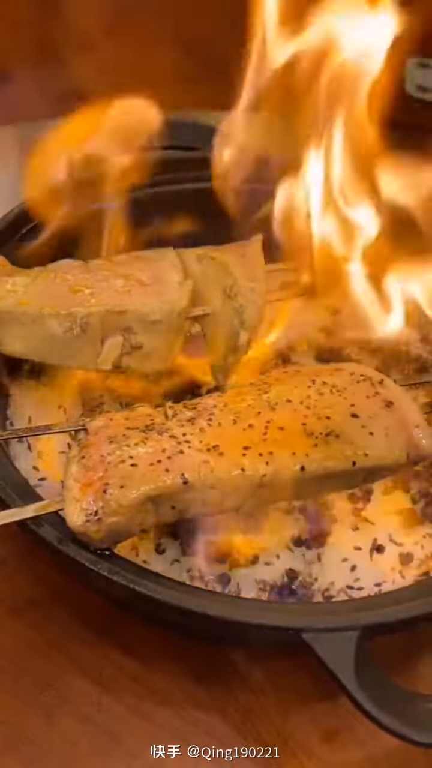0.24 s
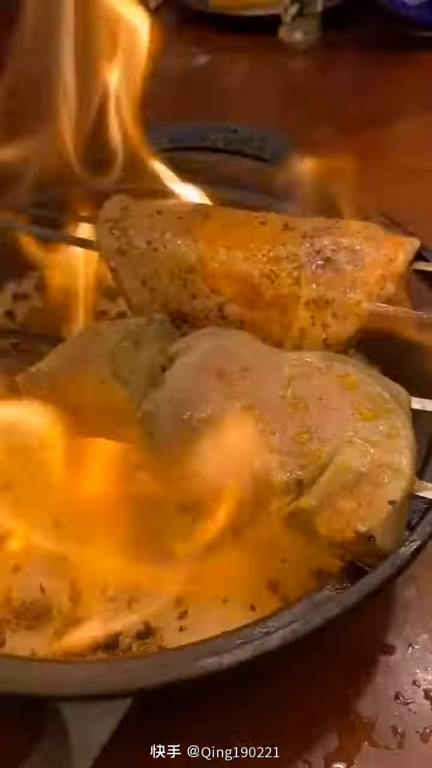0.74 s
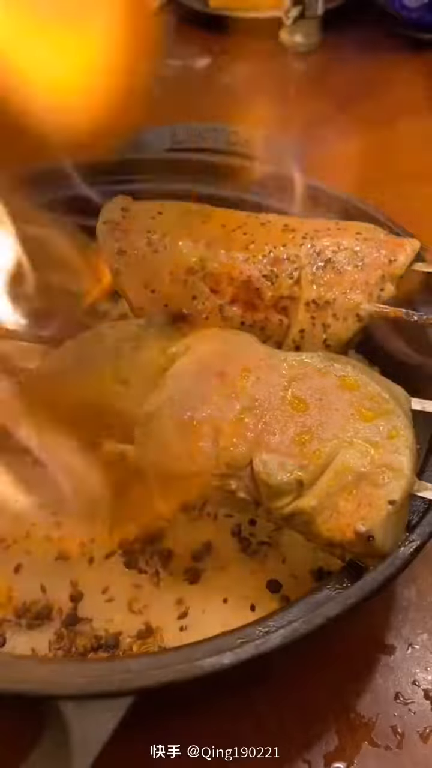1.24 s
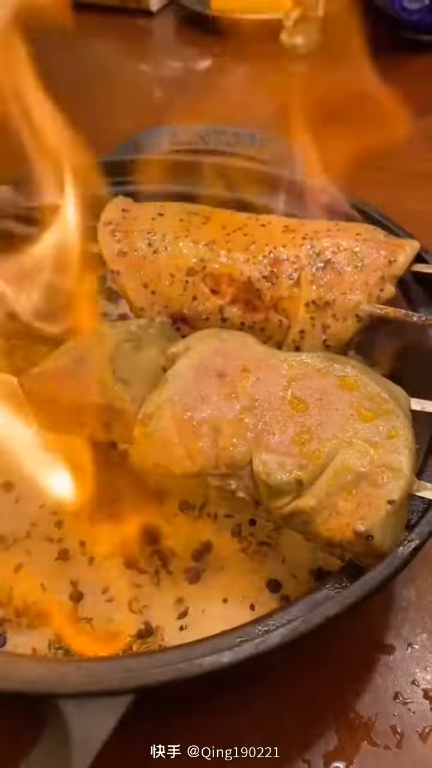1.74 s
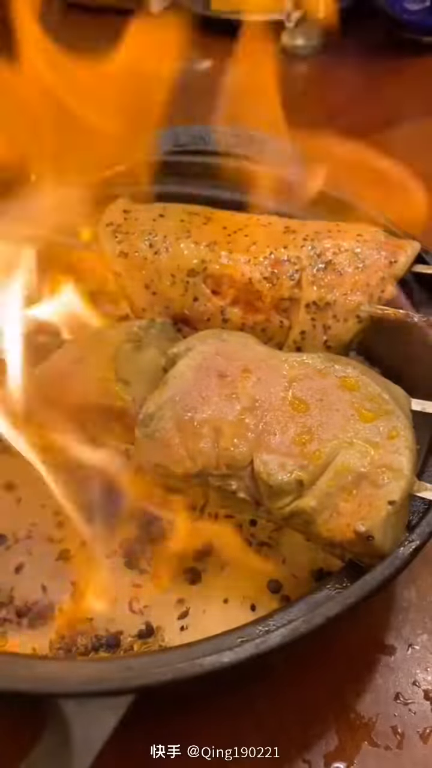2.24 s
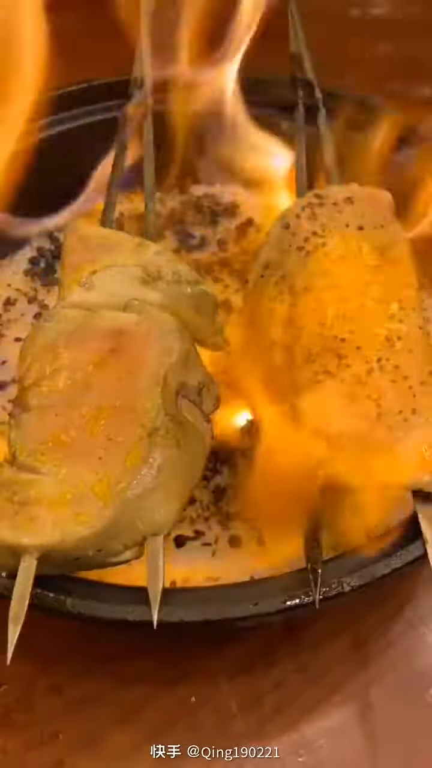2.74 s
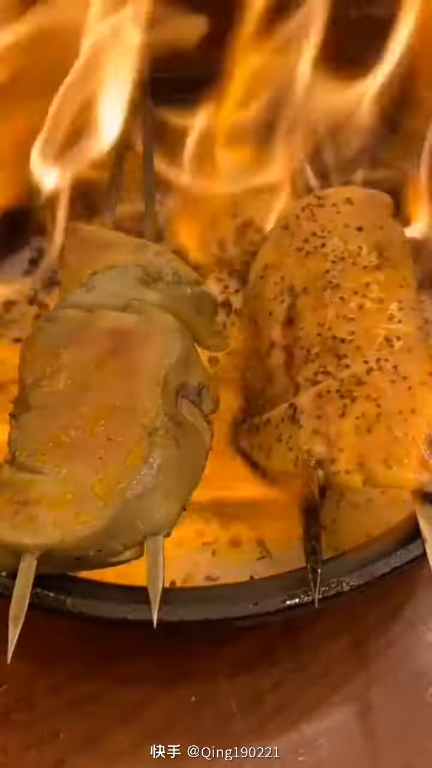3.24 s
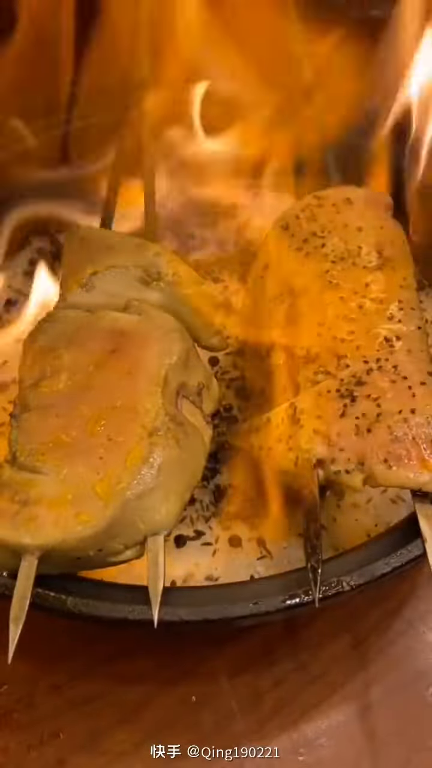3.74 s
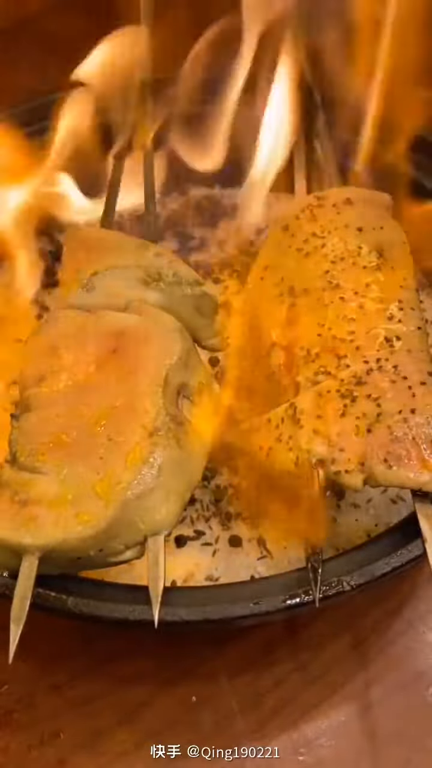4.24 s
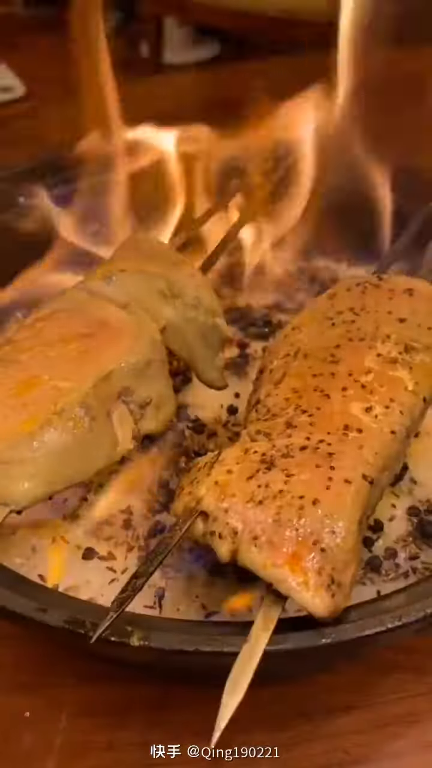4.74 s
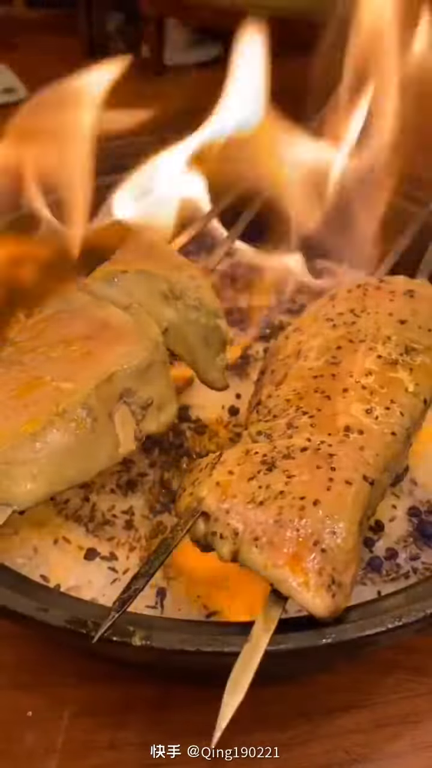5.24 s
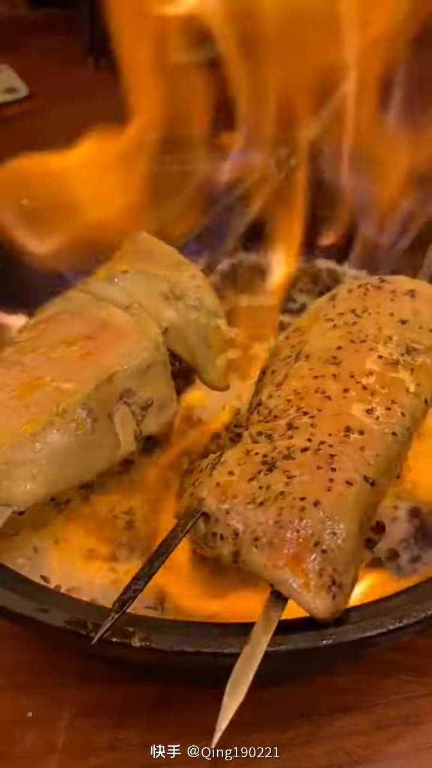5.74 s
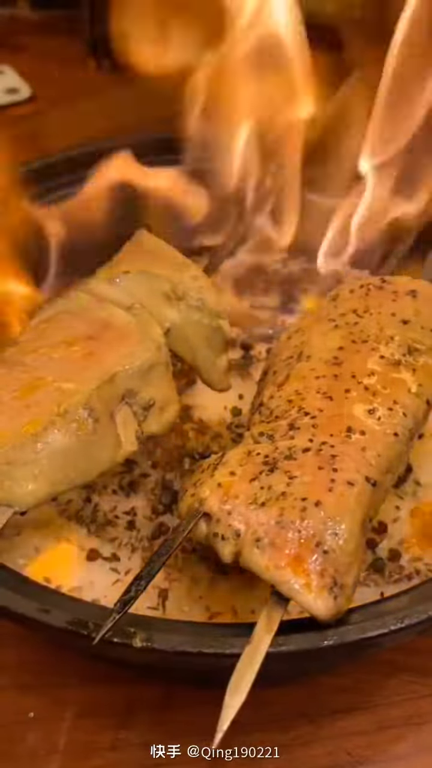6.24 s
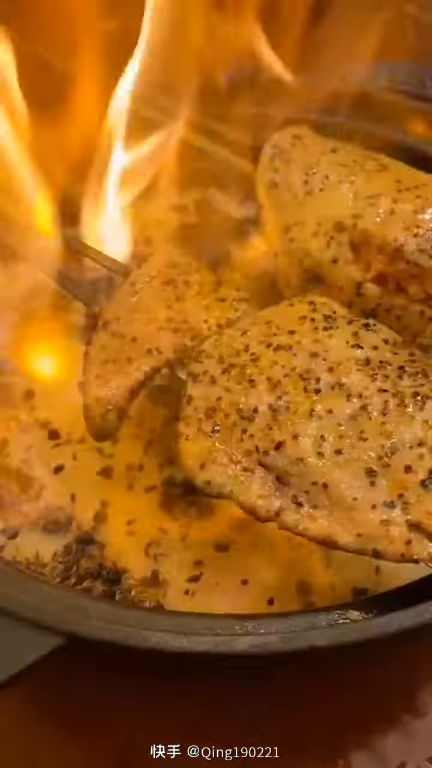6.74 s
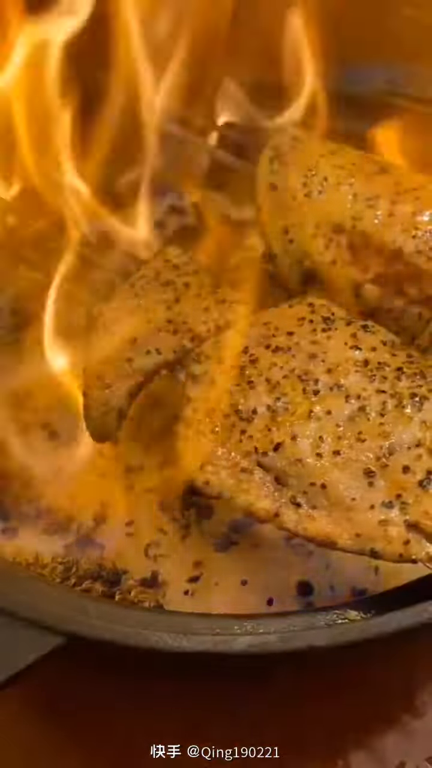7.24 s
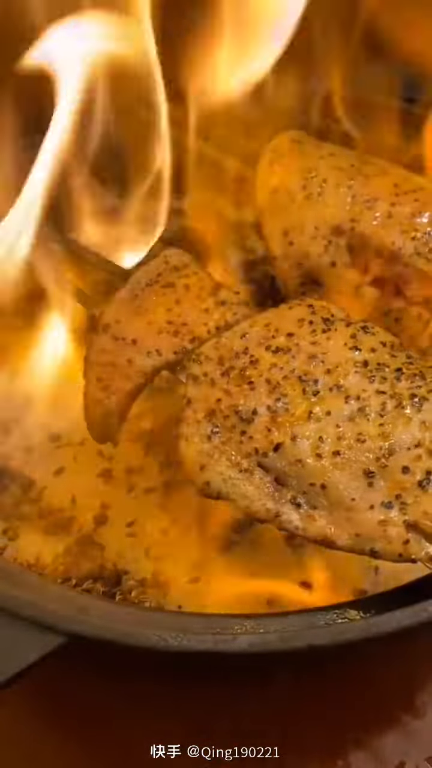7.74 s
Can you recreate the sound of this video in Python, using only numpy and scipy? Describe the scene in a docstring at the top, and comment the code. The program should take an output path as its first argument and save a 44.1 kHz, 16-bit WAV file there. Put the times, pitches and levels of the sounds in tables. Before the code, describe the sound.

Skewered meat drips fat into a flaming pan of hot salt and spices. Fine bright sizzle comes in irregular spurts over a quiet simmer, with coarse spatter and sharp, snapping pops. Flames flutter and rumble low beneath, with a faint mains hum. The level dips almost to silence four times, each time returning with a slightly different tone. Close stereo microphone, small dry indoor space.

```python
"""Fat dripping from skewered food fries in a pot of hot salt: noise follows swarms of tiny bursts.
It sizzles and spatters in spurts over a quiet simmer, and larger droplets burst as sharp cracks
with a falling pulse; one short squeak of steam is narrow noise. Flames rumble in billowing low noise.
A wavering sine is the mains hum underneath, and four times the whole sound dips briefly to near silence."""
import sys
import numpy as np
from scipy import signal
from scipy.fft import rfft, irfft
from scipy.io import wavfile
from scipy.ndimage import uniform_filter1d

SR = 44100
rng = np.random.default_rng(int(sys.argv[2]) if len(sys.argv) > 2 else 0)


def digitize_waveform(pressure):
    """Quantize a signal to 16-bit integers and store it at the path in sys.argv[1].

    Rows of a 2-D input are taken as channels; values are limited to [-1, 1].
    """
    field = np.atleast_2d(pressure).T
    bounded = np.clip(field, -1, 1)
    quanta = np.round(bounded * 32767).astype(np.int16)
    wavfile.write(sys.argv[1], SR, quanta)


N = 352800
HZ = np.fft.rfftfreq(N, 1 / SR)
TIME = np.arange(N) / SR


def amp(db):
    """Decibels to gain."""
    return 10 ** (np.asarray(db) / 20)


def unit(x):
    """Scales to an rms of one."""
    return x / np.sqrt(np.mean(x ** 2) + 1e-20)


def read(points, axis=1):
    """One column of a frequency table, joined up along a log frequency axis."""
    points = np.asarray(points)
    return np.interp(np.log(HZ + 1), np.log(points[:, 0]), points[:, axis])


def add(mix, s, sound):
    """Mixes a sound in at a time in seconds."""
    part = mix[..., max(round(s * SR), 0):][..., :sound.shape[-1]]
    part += sound[..., :part.shape[-1]]


def colour(x, points, lag_cycles=0):
    """Filters with a curve of rms gain one; lagging by cycles delays the lows most, so clicks fall in pitch."""
    gain = unit(amp(read(points)))
    lag = np.exp(-2j * np.pi * lag_cycles * np.log(HZ + 100))
    return irfft(rfft(x) * gain * lag, N)


def wander(rate_hz):
    """Slow random drift of rms one: noise low-passed at the given rate."""
    return unit(irfft(rfft(rng.standard_normal(N)) / (1 + (HZ / rate_hz) ** 4), N))


def bursts(per_s, spread_db, decay_s):
    """Power of a swarm of tiny decaying bursts, many small and few large, with a mean of one."""
    happens = rng.random(N) < per_s / SR
    sizes = amp(spread_db * np.minimum(rng.exponential(1, N), 3.6)) * happens
    power = signal.lfilter([1], [1, -np.exp(-1 / (decay_s * SR))], sizes ** 2)
    return power / power.mean()


def crackle(power, smooth_share):
    """Noise that follows a swarm of bursts, over a steady wash of ones too small to tell apart."""
    return np.sqrt(smooth_share + (1 - smooth_share) * power) * rng.standard_normal((2, N))


def ports(pair):
    """Two microphone ports: two signals become left and right, most alike in the bass, apart in phase above."""
    # Each row: frequency in Hz, likeness from 0 to 1, lead of the left in radians, left over right in dB.
    stereo_rows = [(90, .9994, 0, 0), (170, .996, 0, 0), (330, .98, 0, 0), (750, .89, -.2, 0),
                   (1300, .995, 0, 0), (2050, .98, .1, 0), (2600, .64, 1.4, -3), (2950, .5, 2.6, 0),
                   (3150, .25, 1.6, 0), (3400, .6, .3, -2), (4350, .5, 1, -1), (4850, .68, 3.3, 0),
                   (5300, .78, 6.3, 0), (7000, .52, 7.3, 0), (9400, .5, 8.3, 0), (9900, .54, 6.7, 0),
                   (10600, .42, 7.3, 0), (11050, .25, 9.4, 0), (11500, .76, 12.6, 0), (13500, .45, 13.4, 0),
                   (15500, .28, 14.2, 0)]
    shared, own = rfft(pair)
    alike = read(stereo_rows)
    # half of the lead and of the level difference goes to each side
    turn = np.exp(.5j * read(stereo_rows, axis=2)) * amp(.5 * read(stereo_rows, axis=3))
    shared = shared * np.sqrt((1 + alike) / 2)
    own = own * np.sqrt((1 - alike) / 2)
    return irfft(np.array([(shared + own) * turn, (shared - own) / turn]), N)


def room(x, t60_s=0.029, wet_db=-17):
    """Faint, quick reflections from the table and walls: sparse random taps that die away."""
    t = np.arange(SR // 3) / SR
    hits = rng.random((2, len(t))) < 2000 / SR  # 2000 reflections per second
    taps = rng.standard_normal((2, len(t))) * hits * (t > .002) * amp(-60 * t / t60_s)
    taps = taps / np.linalg.norm(taps[0])
    return x + amp(wet_db) * signal.fftconvolve(x[:1], taps, axes=1)[:, :N]


def placed(x, echo_edge_hz=5000, air_hz=12000):
    """An echo off the table combs the sound, differently wherever the microphone is held."""
    # Each row: start in seconds, spacing of the comb in Hz, echo strength as a signed gain,
    # gain in dB that the top treble tends to (half of these dB at air_hz).
    place_rows = [(0, 2450, -0.071, -7.5), (.76, 2300, 0.15, -5), (2.612, 1590, 0.035, -7),
                  (4.595, 2330, 0.21, -3.5), (6.627, 803, -0.16, -9.5)]
    spectrum, out = rfft(x), np.zeros((2, N))
    for s, comb_hz, strength, air_db in place_rows:
        echo = strength * np.exp(-2j * np.pi * HZ / comb_hz) / (1 + (HZ / echo_edge_hz) ** 2)
        air = amp(air_db * HZ ** 4 / (HZ ** 4 + air_hz ** 4))
        out = np.where(TIME >= s, irfft(spectrum * (1 + echo) * air, N), out)
    return out


def hum(hz=100, peak_db=-43, waver_db=3.0):
    """A mains hum: one sine that wavers in level and a little in phase."""
    phase_drift = 0.13 * wander(2.3)  # radians
    return amp(peak_db + waver_db * wander(5.6)) * np.sin(2 * np.pi * hz * TIME + phase_drift)


def flames(steady_db=-44, flare_s=0.05, lift_db=3):
    """The low roar of hot gas, billowing in uneven puffs and swelling with each flare."""
    # The flames leap up. Each row: peak in seconds, roar in dB ahead of the lift.
    flare_rows = [(.29, -36), (1.3, -44.5), (2.08, -41.5), (2.72, -44), (3.28, -44), (3.61, -44.5),
                  (4.45, -40.5), (5.51, -36), (6.18, -42.5), (6.46, -38), (6.74, -40), (6.99, -39)]
    # Tone of the roar. Each row: frequency in Hz, relative level in dB.
    rumble_tone = [(15, -32), (30, -23), (45, -3), (60, -0.5), (82, 1), (102, -2.5), (135, -3), (190, -12),
                   (400, -29)]
    power = amp(steady_db) ** 2
    for s, db in flare_rows:
        power = power + amp(db) ** 2 * np.exp(-((TIME - s) / flare_s) ** 2)
    puffs = unit(amp(2.6 * wander(15)))
    roar = colour(rng.standard_normal((2, N)), rumble_tone)
    return amp(lift_db) * np.sqrt(power) * puffs * roar


def squeak(s=1.2565, hz=8000, width_hz=450, decay_s=0.01, db=-25):
    """Steam escapes through a tiny hole with one short, high squeak: narrow noise that starts at once and dies."""
    band = np.exp(-.5 * ((HZ - hz) / width_hz) ** 2)
    jet = unit(irfft(rfft(rng.standard_normal((2, N))) * band, N))
    return amp(db) * jet * (TIME > s) * np.exp(-abs(TIME - s) / decay_s)


def pops(spray_db=-23, ragged=0.32):
    """A droplet bursts with a crack and a short spray; its pressure pulse falls in pitch to a puff."""
    # The loudest droplets. Each row: time in seconds, body in dB and crack in dB, both ahead of the final lifts.
    pop_rows = [(0.0314, -20, -18), (0.1287, -42, -25), (0.2275, -28, -43), (0.4478, -29, -18),
                (0.4818, -16, -24), (0.4937, -18, -19), (0.5048, -21, -21), (0.5158, -18, -25),
                (0.685, -31, -28), (0.7988, -25, -29), (0.8306, -26, -35), (0.9648, -30, -28),
                (1.0205, -26, -21), (1.043, -26, -19), (1.1184, -26, -26), (1.2924, -26, -29),
                (1.3865, -16, -22), (1.4475, -29, -36), (1.5297, -25, -30), (1.5483, -23, -32),
                (1.5788, -16, -28), (1.5942, -20, -33), (1.8812, -24, -29), (1.9063, -18, -19),
                (1.951, -19, -23), (2.0487, -25, -39), (2.1451, -19, -28), (2.2354, -28, -29),
                (2.3048, -26, -34), (2.4389, -27, -25), (2.517, -29, -26), (2.6415, -32, -23),
                (2.7161, -18, -17), (2.7444, -23, -24), (2.7923, -31, -21), (2.8641, -28, -26),
                (2.9954, -24, -23), (3.1043, -41, -26), (3.2696, -32, -23), (3.4462, -27, -24),
                (3.4854, -30, -20), (3.494, -37, -24), (3.7121, -33, -23), (3.8707, -36, -27),
                (3.9037, -34, -29), (3.9637, -28, -25), (3.9763, -37, -24), (4.0752, -27, -27),
                (4.2758, -28, -31), (4.4855, -30, -32), (4.7506, -37, -29), (4.8007, -33, -20),
                (4.8127, -23, -19), (4.9937, -40, -28), (5.0685, -38, -25), (5.141, -26, -24),
                (5.2051, -34, -27), (5.3867, -32, -29), (5.3938, -26, -35), (5.6643, -12.5, -18),
                (6.1219, -32, -26), (6.167, -30, -26), (6.1765, -30, -28), (6.2006, -27, -27),
                (6.2807, -31, -25), (6.4048, -32, -23), (6.4403, -39, -23), (6.5037, -31, -24),
                (6.6754, -31, -27), (6.7205, -30, -22), (6.8023, -30, -29), (6.8907, -23, -25),
                (6.9242, -26, -24), (6.9511, -28, -21), (7.039, -16, -25), (7.0495, -21, -24),
                (7.1604, -14, -21), (7.288, -29, -16), (7.3836, -25, -30), (7.4212, -33, -24),
                (7.4786, -21, -16), (7.5479, -28, -24), (7.6419, -33, -20), (7.7383, -29, -26),
                (7.858, -24, -20), (7.9622, -18, -18)]
    # Tones of the pulse and of the crack. Each row: frequency in Hz, relative level in dB.
    body_tone = [(70, -10), (250, -4), (500, -4), (1150, -5.5), (1700, 3), (2400, 0), (3200, -16),
                 (6000, -31)]
    crack_tone = [(1500, -16), (3200, -2), (5500, 1.5), (8500, -1), (11000, -1.5), (16000, -4)]
    swell_s, crack_s, spray_s = .0004, .00048, .0025  # time constants
    t = np.arange(round(.02 * SR)) / SR
    pulses, cracks = np.zeros((2, 2, N))
    for s, body_db, crack_db in pop_rows:
        # bright, thin pops spray the most, up to a limit
        wetness = min(amp(spray_db + 0.49 * (crack_db - body_db)), 1 / 10)
        decay = np.exp(-t / crack_s) + wetness * np.exp(-t / spray_s)
        noise = (1 - np.exp(-t / swell_s)) * decay * rng.standard_normal((2, 2, len(t)))
        low, high = noise / np.linalg.norm(noise, axis=-1, keepdims=True)
        add(pulses[0], s, amp([body_db]))  # a clean click
        add(pulses, s - swell_s, ragged * amp(body_db) * low)  # roughened by noise
        add(cracks, s, amp(crack_db) * high)
    body = amp(17.5) * colour(pulses, body_tone, lag_cycles=1.05)
    return body + amp(22.0) * colour(cracks, crack_tone)


def patchy(x, patchy_db=1.59):
    """The colour shifts at random in small patches of time and pitch, as fat boils in different spots."""
    z = signal.stft(x, nperseg=256)[2]
    patches = uniform_filter1d(rng.standard_normal(z.shape[1:]), size=5, axis=0)
    patches = unit(uniform_filter1d(patches, size=10, axis=1))
    return signal.istft(z * unit(amp(patchy_db * patches)))[1][:, :N]


def boiling(attack_s=0.027, release_s=0.04, rise_db=0.26):
    """Gains of flutter, spatter and sizzle: each spurt builds, holds and dies over a steady simmer."""
    # Drips of fat that boil off. Each row: start in seconds, length in seconds,
    # then flame flutter, coarse spatter and fine sizzle in dB ahead of the frying mix.
    spurt_rows = [(-0.015, 0.036, -53, -30.5, -25.5), (0.097, 0.14, -39.0, -38.5, -37),
                  (0.25, 0.029, -42, -47, -31), (0.332, 0.063, -46, -33.5, -30.5),
                  (0.409, 0.11, -33.5, -29.5, -28), (0.671, 0.021, -57, -40, -29.5),
                  (0.754, 0.085, -37.5, -34.5, -40), (0.924, 0.04, -44.5, -37, -34),
                  (1.004, 0.017, -44, -40, -29), (1.098, 0.018, -37, -52, -49),
                  (1.309, 0.072, -32.5, -34.5, -34.5), (1.513, 0.084, -43.5, -27.5, -31),
                  (1.612, 0.096, -43, -47, -38), (1.8, 0.1, -40.5, -33.5, -31),
                  (2.111, 0.021, -31.5, -46, -40), (2.167, 0.07, -46, -39, -37),
                  (2.275, 0.061, -40.5, -37.5, -39.5), (2.369, 0.068, -49, -37.5, -33),
                  (2.47, 0.072, -41, -41.5, -38), (2.622, 0.12, -33, -31, -27.5),
                  (2.764, 0.096, -40, -39.5, -31), (2.883, 0.12, -38, -35, -27),
                  (3.006, 0.091, -43.5, -38, -30), (3.132, 0.19, -43.5, -41, -31),
                  (3.349, 0.12, -37.5, -37, -26), (3.674, 0.035, -48, -40, -29),
                  (3.931, 0.078, -43, -40, -34.5), (4.004, 0.092, -39.5, -36.5, -29),
                  (4.393, 0.025, -43, -38.5, -40.5), (5.02, 0.069, -47, -45.5, -39),
                  (5.13, 0.063, -47, -41.5, -39.5), (5.318, 0.045, -41, -39, -33),
                  (5.475, 0.13, -43, -40, -36.5), (5.635, 0.02, -39, -44, -42.5),
                  (5.856, 0.028, -41.5, -42, -35), (6.116, 0.052, -37.5, -39, -35),
                  (6.266, 0.021, -59, -45, -40), (6.373, 0.057, -41.5, -39, -33),
                  (6.637, 0.16, -42.5, -41.5, -38), (6.828, 0.11, -35.5, -34.5, -30.5),
                  (6.982, 0.15, -37, -30.5, -29), (7.151, 0.054, -34, -29, -28.5),
                  (7.277, 0.065, -36.5, -40, -31.5), (7.37, 0.23, -42.5, -40, -36.5),
                  (7.581, 0.098, -38.5, -34, -27.5), (7.837, 0.036, -57.5, -38, -29),
                  (7.886, 0.063, -36, -33.5, -29)]
    # The simmer between spurts. Each row: start in seconds, then the same three levels in dB.
    simmer_rows = [(0.0, -44, -44, -42.5), (0.76, -48, -43.5, -40), (2.612, -47, -44, -36),
                   (4.595, -49.5, -48.5, -39.5), (6.627, -50, -42.0, -36.5)]
    power = np.zeros((3, N))
    for s, *layers_db in simmer_rows:
        power[:, TIME >= s] = amp(layers_db)[:, None] ** 2
    t = np.arange(SR // 2) / SR
    for s, length, *layers_db in spurt_rows:
        # the level creeps up slightly over the length of the spurt
        held = np.minimum(t / attack_s, 1) * amp(rise_db * np.minimum(t / length, 1))
        shape = held * np.exp(-np.maximum(t - length, 0) / release_s)
        gains = amp(layers_db)[:, None] * shape
        add(power, s, gains[:, t >= -s] ** 2)  # a spurt already under way at zero loses its start
    return np.sqrt(power)


def frying():
    """Droplets boil off on the salt: each spits, fizzes and puffs up the flame around it."""
    # Tones of the three layers. Each row: frequency in Hz, relative level in dB.
    flutter_tone = [(70, -18), (150, -4.5), (260, -1.5), (450, -4), (750, -9.5), (1100, -11), (2200, -81)]
    spatter_tone = [(500, -45), (950, -9.5), (1250, -6.5), (1600, 1), (2100, -3), (2550, -1.5),
                    (3000, -6.5), (4500, -21)]
    sizzle_tone = [(1400, -21), (2600, -11.5), (3400, -2.5), (4400, -0.5), (6000, -0.5), (8800, -0.5),
                   (9900, -2), (10800, 0.5), (12500, -1), (15700, -1)]
    drops = bursts(per_s=600, spread_db=4.5, decay_s=0.00083)
    bubbles = bursts(per_s=2400, spread_db=1.5, decay_s=0.0002)
    # grains of hot salt split with small, dry ticks
    ticks = .22 * bursts(per_s=90, spread_db=2, decay_s=.0004)
    flutter = colour(crackle(drops, smooth_share=0.36), flutter_tone, lag_cycles=1.1)
    spatter = colour(crackle(drops + ticks, smooth_share=0.36), spatter_tone, lag_cycles=0.294)
    fizz = crackle(.65 * bubbles + .35 * drops + ticks, smooth_share=.27)
    sizzle = colour(fizz, sizzle_tone)
    uneven = unit(amp(1.79 * wander(47) + 0.68 * wander(6.8)))  # the fat boils off unevenly
    licks = unit(amp(1.94 * wander(13)))  # tongues of flame come and go
    flutter_gain, spatter_gain, sizzle_gain = boiling()
    mix = amp(1.34) * flutter_gain * licks * flutter
    mix = mix + amp(-0.35) * spatter_gain * spatter
    mix = mix + amp(-0.15) * sizzle_gain * sizzle
    return uneven * mix


def scene():
    """Flames, frying, pops and a squeak in a room, heard from close above the pot, over the hum."""
    pot = placed(patchy(frying()) + pops() + squeak())
    return ports(room(flames() + pot)) + hum()


def record(dry, edge_hz=15850, floor_db=-39):
    """The level dips briefly four times, down to a faint floor; then the top treble is cut off."""
    # Each row, all in seconds: fade starts, lowest from, lowest until, back at full level.
    dip_rows = [(.706, .746, .779, .798), (2.568, 2.6, 2.626, 2.641), (4.53, 4.585, 4.612, 4.634),
                (6.572, 6.612, 6.644, 6.67)]
    fader = np.ones(N)
    for times in dip_rows:
        fader *= np.interp(TIME, times, [1, 0, 0, 1]) ** 2
    faded = dry * (fader + amp(floor_db))
    low_pass = signal.firwin(511, edge_hz, window=("kaiser", 9), fs=SR)
    return signal.oaconvolve(faded, low_pass[None], "same")


dry = scene()
out = record(dry)
digitize_waveform(out)
```